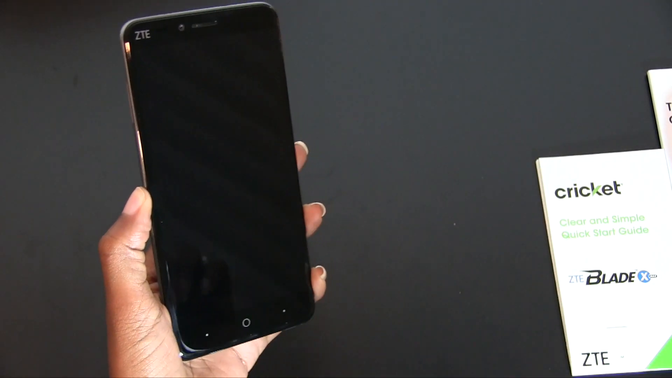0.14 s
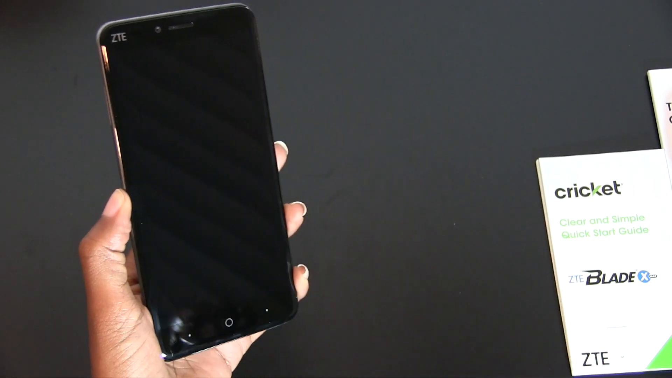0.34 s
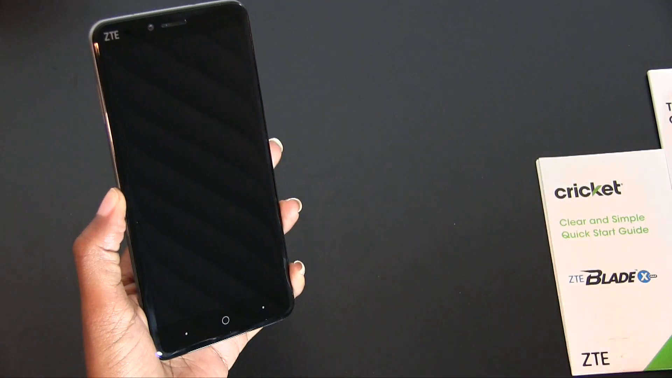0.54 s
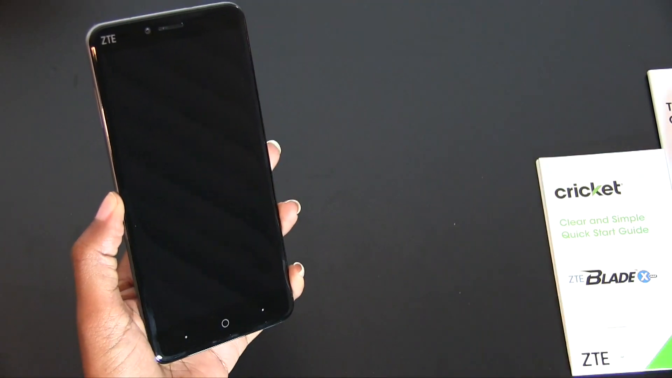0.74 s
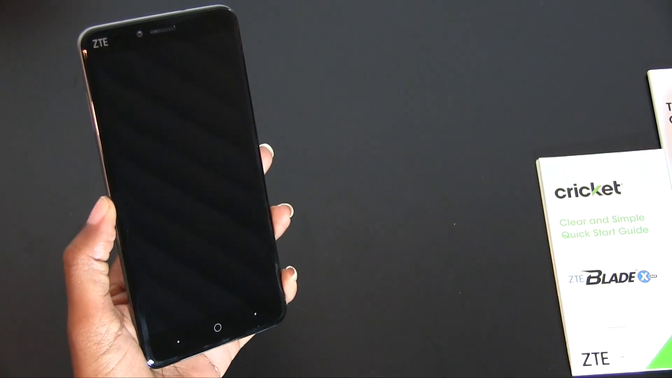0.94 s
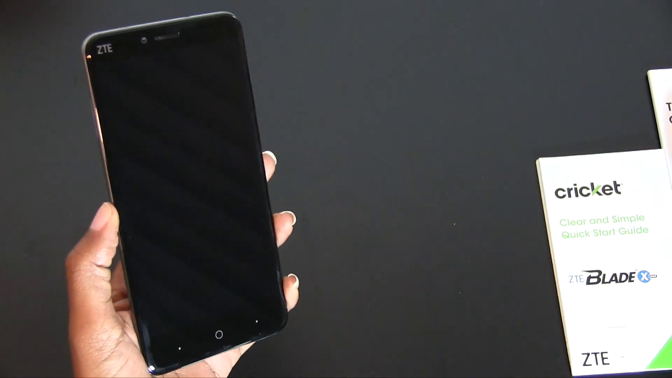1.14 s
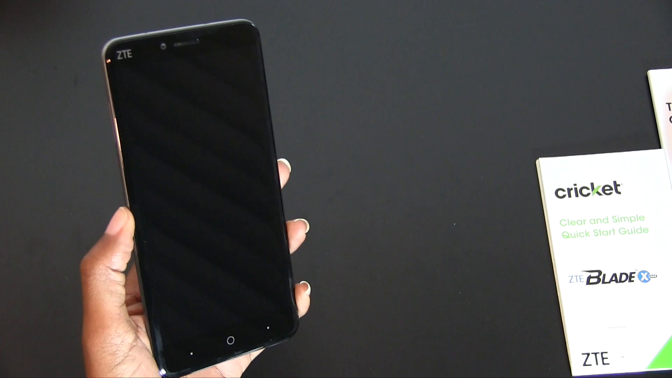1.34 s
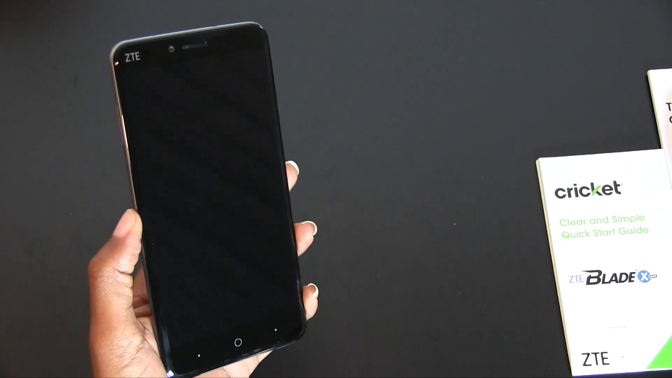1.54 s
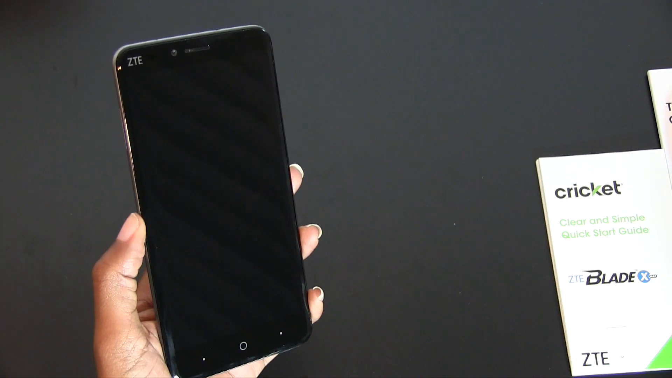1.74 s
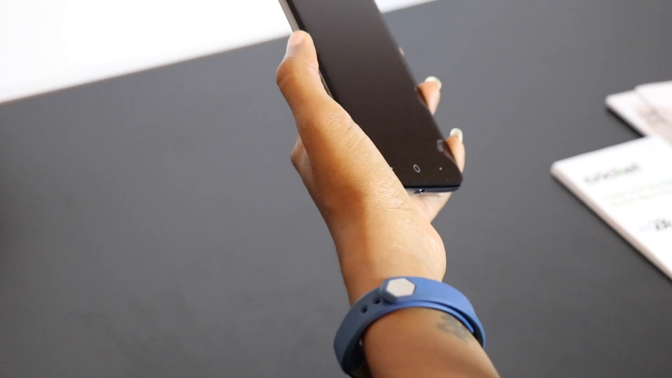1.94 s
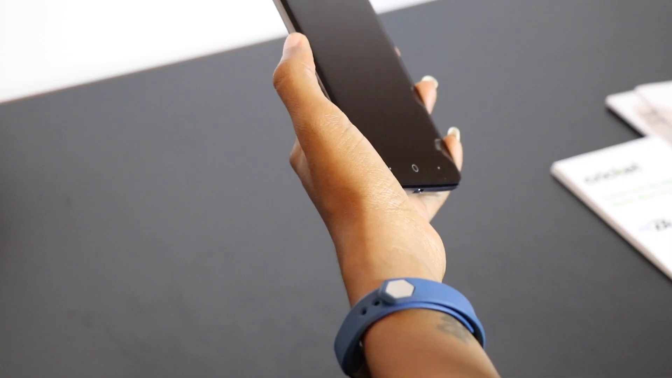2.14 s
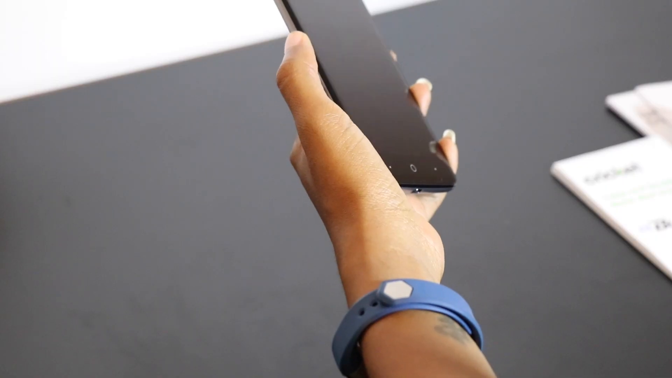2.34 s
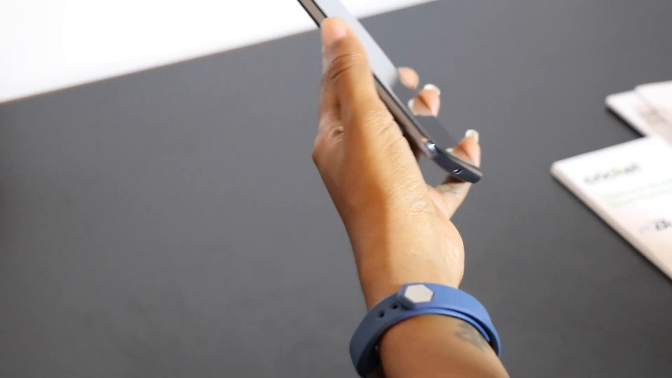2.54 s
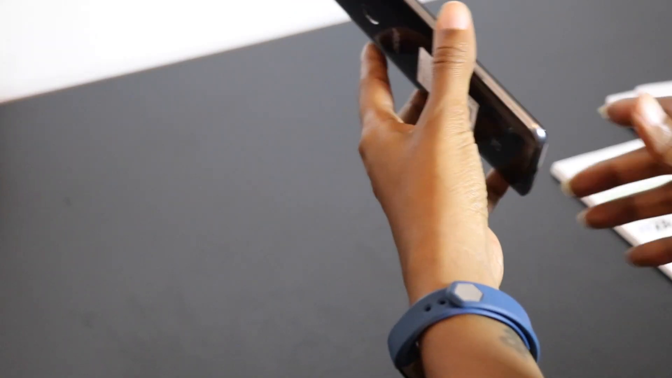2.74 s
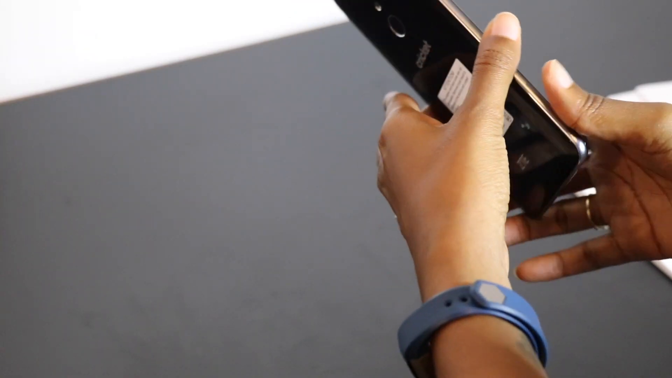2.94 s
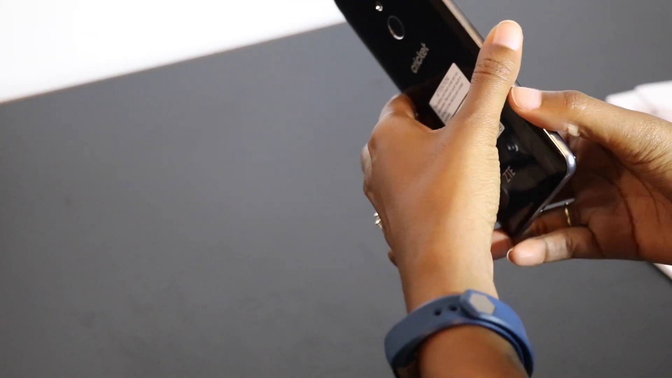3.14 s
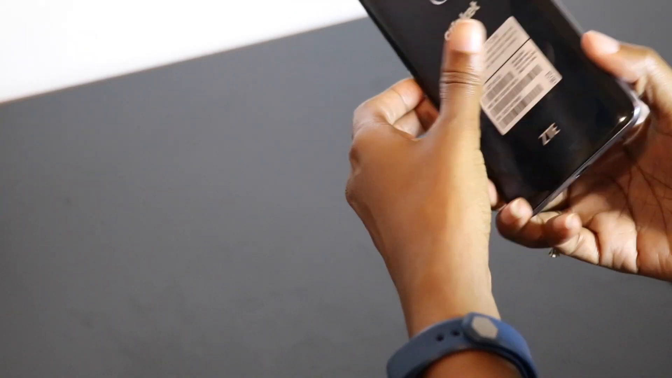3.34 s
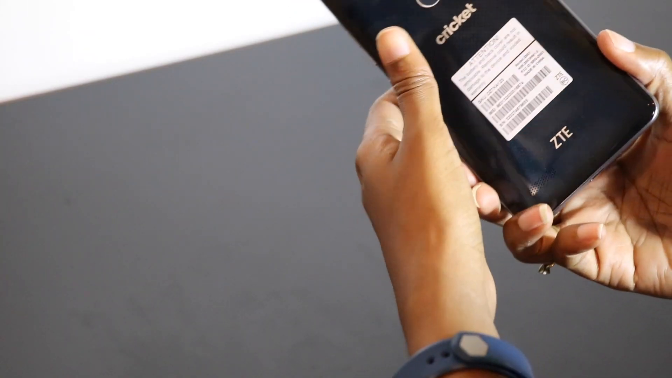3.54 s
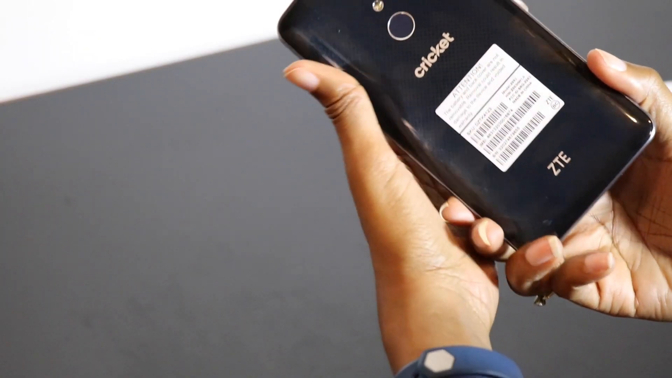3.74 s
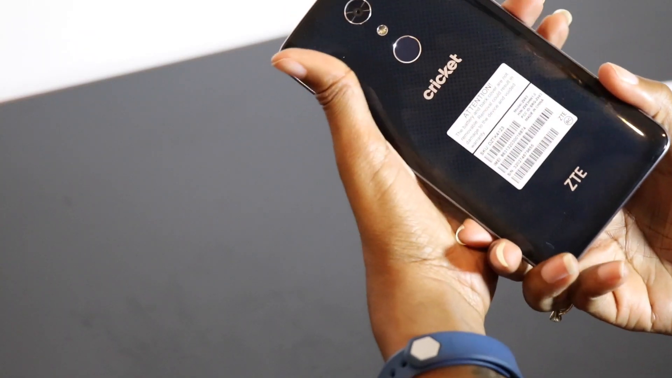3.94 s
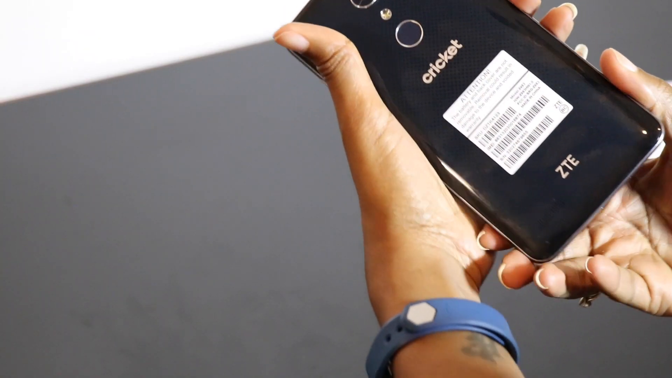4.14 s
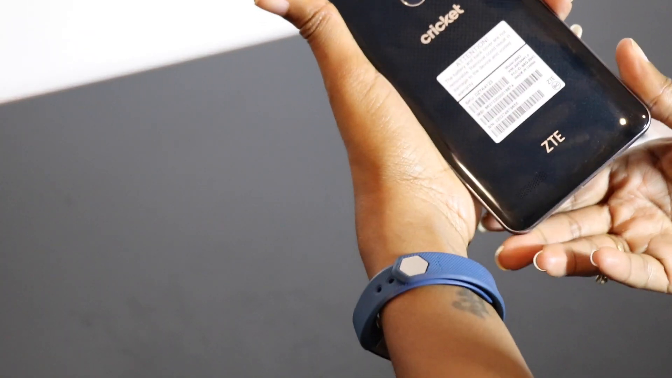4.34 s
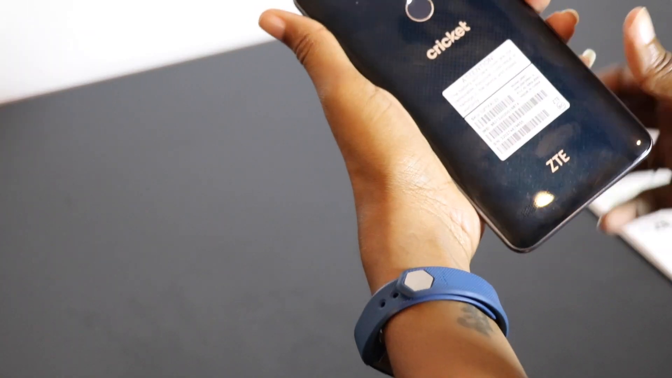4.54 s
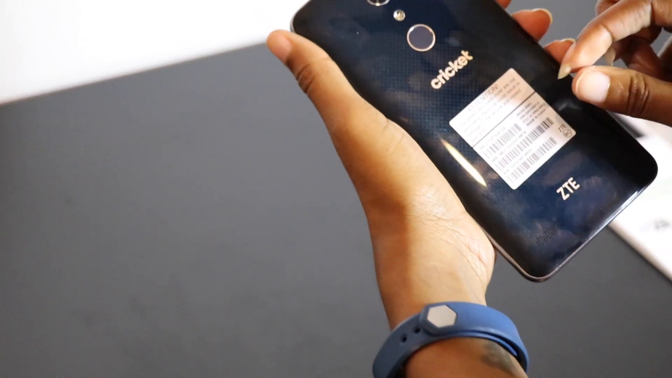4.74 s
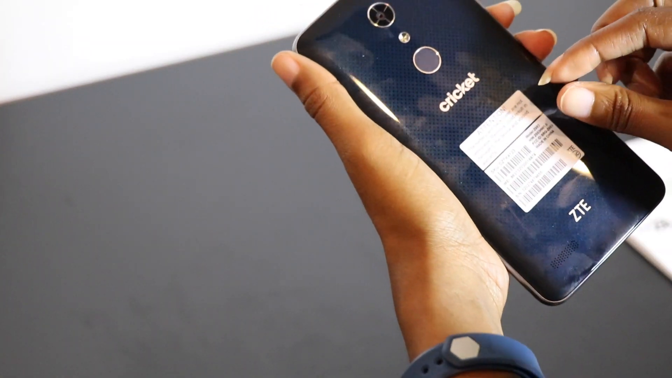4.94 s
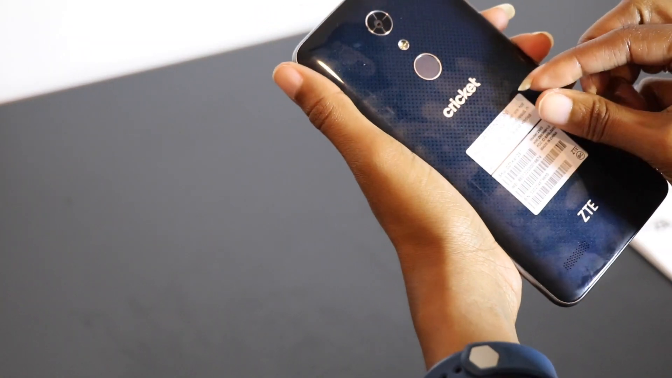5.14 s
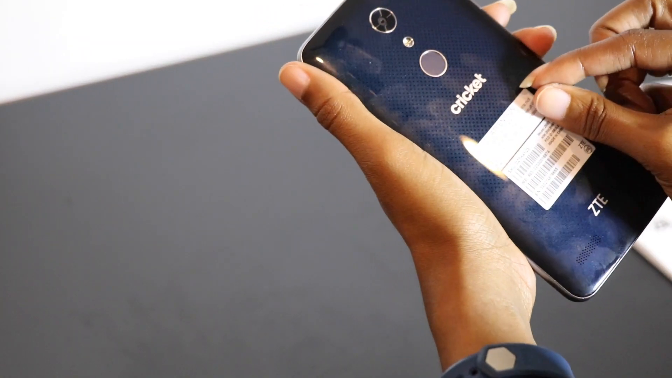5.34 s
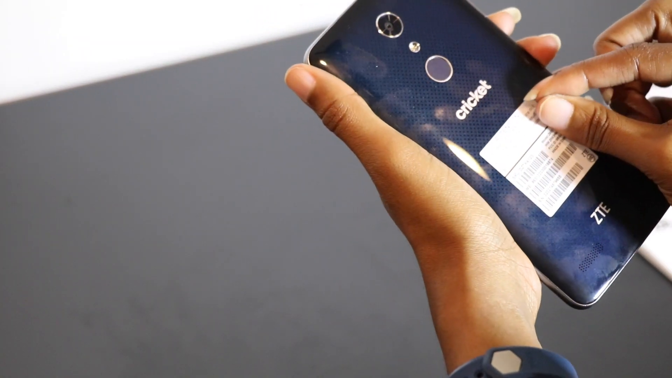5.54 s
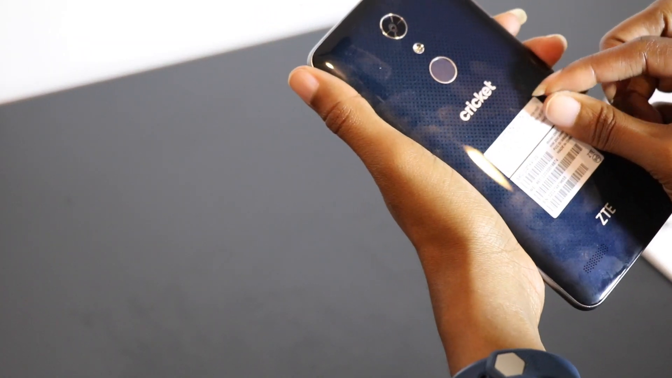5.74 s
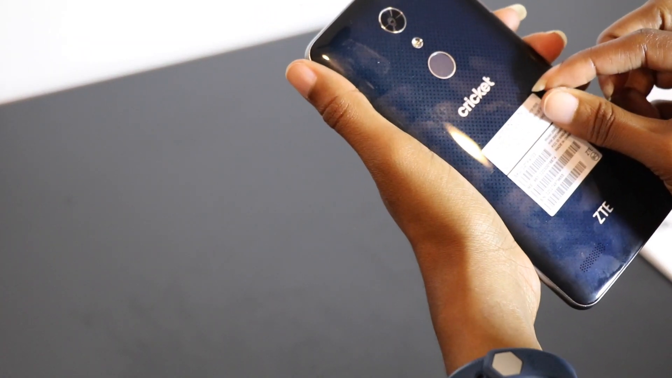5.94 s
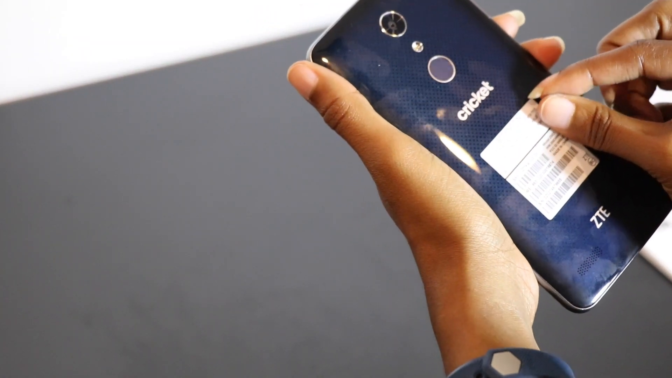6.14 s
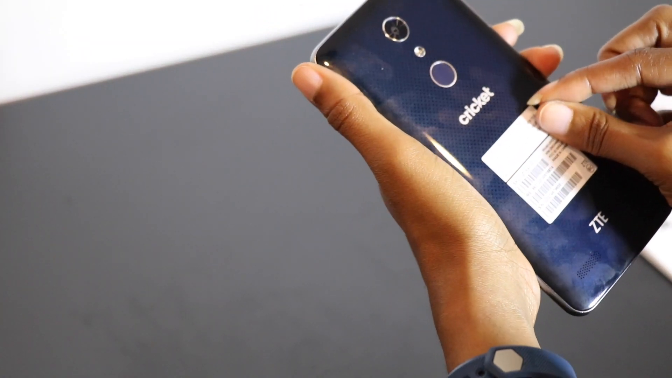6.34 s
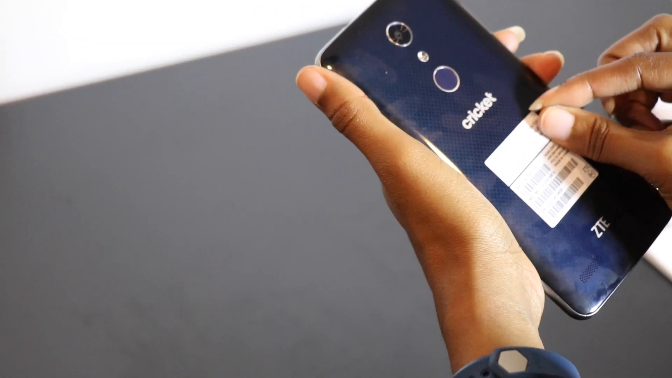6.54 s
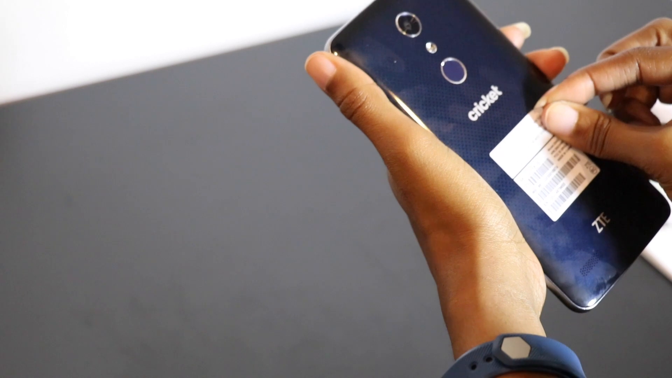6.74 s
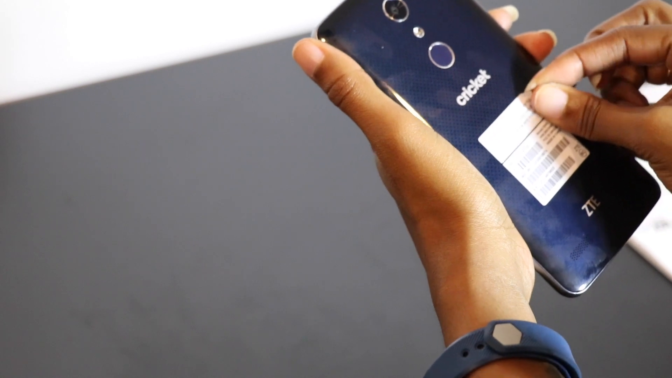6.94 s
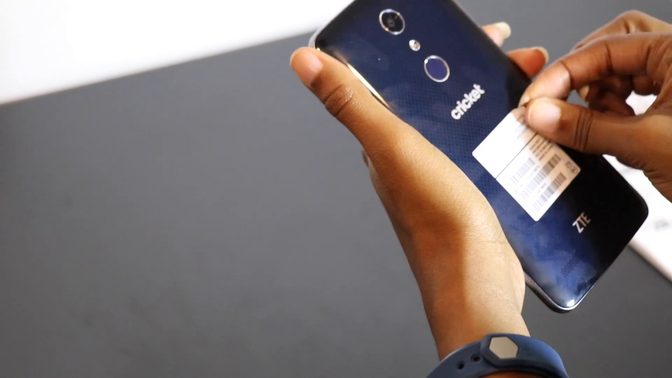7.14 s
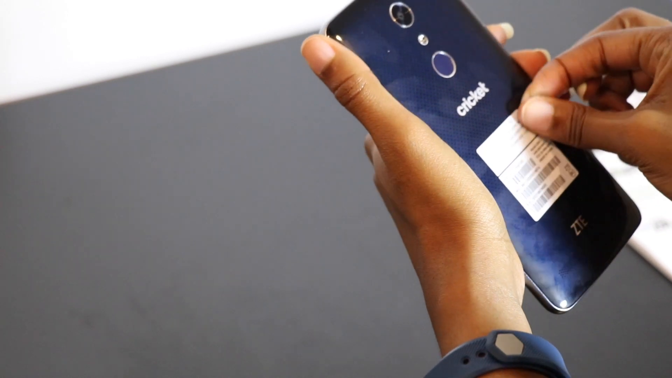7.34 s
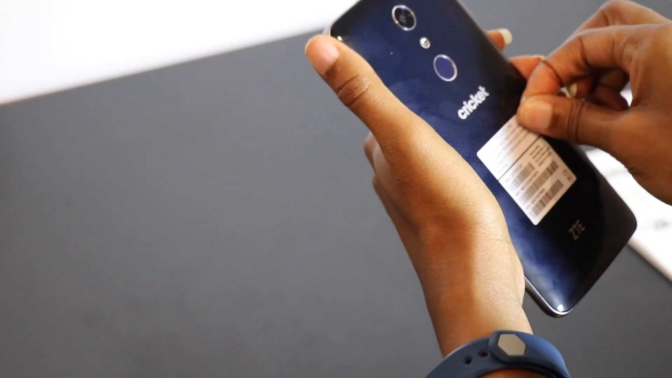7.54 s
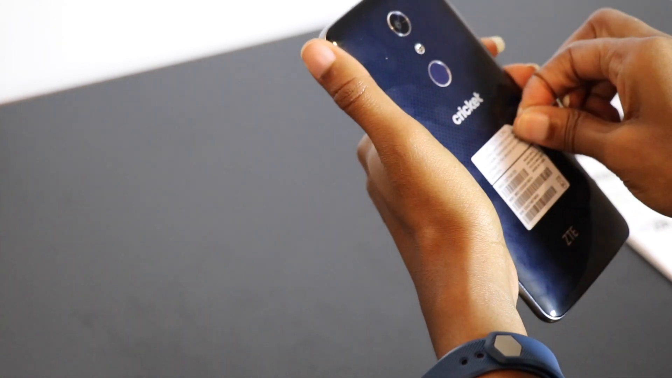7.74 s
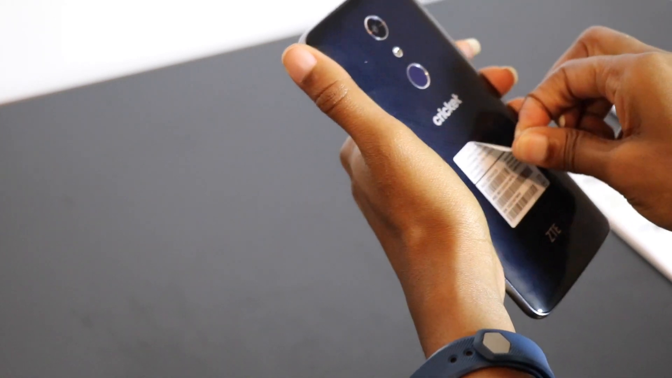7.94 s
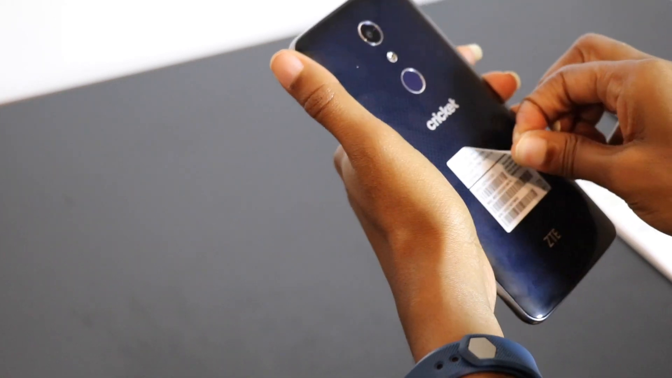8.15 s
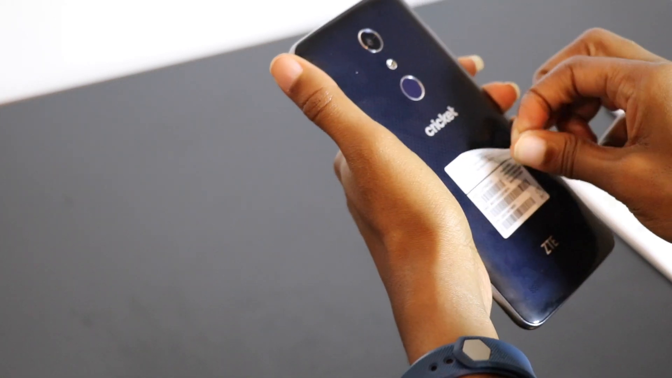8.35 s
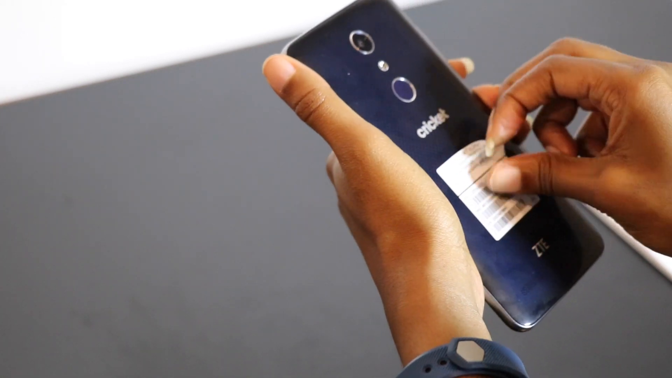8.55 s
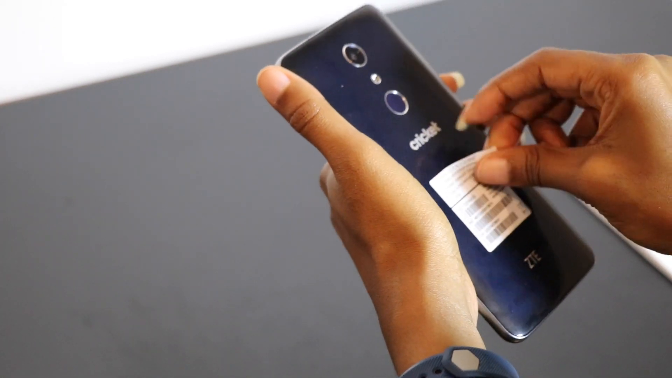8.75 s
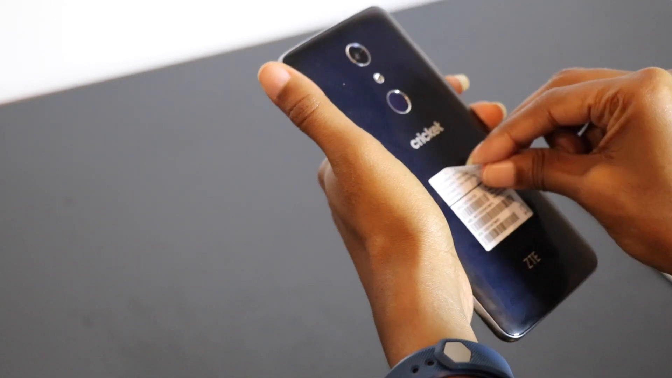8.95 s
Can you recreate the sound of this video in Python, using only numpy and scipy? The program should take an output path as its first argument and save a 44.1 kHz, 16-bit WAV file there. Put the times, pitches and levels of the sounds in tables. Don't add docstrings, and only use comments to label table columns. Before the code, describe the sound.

A quick bright film peel, sparse rustles and skin ticks, then nail picking and a loud stuttering sticker rip in a quiet, softly humming room.

```python
import sys
import numpy as np
from scipy import signal
from scipy.fft import rfft, irfft
from scipy.io import wavfile
from scipy.ndimage import uniform_filter1d

SR = 44100
rng = np.random.default_rng(int(sys.argv[2]) if len(sys.argv) > 2 else 0)


def transcribe(signal):
    frames = np.atleast_2d(signal).T
    limited = np.clip(frames, -1, 1)
    pcm = np.round(limited * 32767).astype(np.int16)
    wavfile.write(sys.argv[1], SR, pcm)


def makeup_ratio(level_db):
    decades = np.asarray(level_db, float) / 20
    return 10 ** decades


N = 400428

# resonance in Hz, width in Hz, level in dB.
SHEET_MODES = [(500, 1300, -9), (1400, 895, -3.5), (2200, 1800, -5), (3685.6, 915, -7.5)]
# resonance in Hz, width in Hz, level in dB.
FLAP_MODES = [(200.8, 320, -19), (430, 96, -14), (1047, 320, -16.5), (1375.5, 240, -8), (1900, 240, 3),
              (1889, 810, -8), (3800, 1400, -10)]
# start in seconds, peak in dB, treble centre in Hz, low ring relative in dB, length in ms.
LABEL_SNAPS = [(6.9916, -16, 7641, -2, 2.0513), (7.9167, -11, 9364, -6, 2.6637),
               (7.7323, -60.5, 7419, 12, 2.83), (7.7915, -54, 7290, -1, 2.26),
               (7.7548, -50, 7160, 3, 2.833), (7.7713, -54, 6950, 4.5, 2.492),
               (8.7392, -60, 7700, 4, 0.984), (8.7418, -58.5, 6600, 14, 5.4), (8.8676, -60, 5470, 10, 1.84),
               (8.8839, -48.5, 8870, 3, 4.9), (8.8863, -30, 10980, -15.5, 2.717),
               (8.9322, -44, 10780, 8.5, 6.472), (8.9338, -41, 9000, -14.5, 9.46),
               (8.9374, -42.5, 9495, -3.5, 5.405), (8.9727, -51, 10990, -14.5, 6)]


def unit(x):
    return x / np.sqrt(np.mean(x ** 2))


def band(x, hz, width):
    return signal.lfilter(*signal.iirpeak(min(hz, 0.4 * SR), hz / width, SR), x)


def below(x, hz):
    return signal.sosfilt(signal.ellip(8, 0.2, 70, hz, fs=SR, output="sos"), x)


def walk(rate, size=N):
    hold = int(SR / rate)
    steps = np.repeat(rng.standard_normal(size // hold + 1), hold)
    return uniform_filter1d(uniform_filter1d(steps, hold), hold)[:size]


def all_directions(sound):
    power = abs(rfft(sound)) ** 2
    high = np.clip(np.arange(len(power)) * SR / len(sound) / 1500 - 1.6, 0, 1)
    power = (1 - high) * uniform_filter1d(power, size=21) + high * uniform_filter1d(power, size=91)
    folded = irfft(np.log(abs(power) + 1e-12)) * (np.arange(len(sound)) < len(sound) // 2)
    folded[0] /= 2
    return irfft(np.exp(rfft(folded)))


def snaps(table, body, wide, air_db, kick, rise_ms, spread, room_db, room_shift=1, room_ring_db=0):
    out = np.zeros((2, N + 2000))
    t = np.arange(2000) / SR
    pull = -1.0 * (np.arange(len(t)) == int(rise_ms * SR / 1000))
    for (s, db, hz, low_db, ms), slips in zip(table, rng.standard_normal((len(table), len(t)))):
        start = int(s * SR)
        rise = np.minimum(t * 1000 / rise_ms / np.sqrt(ms), 1)
        flurry = slips * np.exp(-t * 2200 / ms) * rise
        jerk = kick / ms * pull
        smooth = jerk + flurry * min(ms / 6, 1) ** 3
        ring = sum(makeup_ratio(g) * band(smooth + 0.35 * flurry, f, w) / np.sqrt(w) for f, w, g in body)
        ring = ring / abs(ring).max()

        def radiate(force, centre, width, ring_db):
            treble = band(band(force, centre, width), centre, min(2 * width, 3.7 * centre))
            treble = treble + makeup_ratio(air_db) * band(force, 0.8 * centre, 1.1 * centre)
            return treble / abs(treble).max() + makeup_ratio(ring_db) * ring

        direct = radiate(jerk + flurry, hz, wide * hz, low_db)
        around = radiate(smooth, hz * room_shift, spread * hz, low_db + room_ring_db)
        around = all_directions(around)
        around *= makeup_ratio(room_db) * np.sqrt(np.sum(direct ** 2) / np.sum(around ** 2))
        out[:, start:start + len(t)] += makeup_ratio(db) * np.array([direct, around])
    return out[:, :N]


def scrape(tables, wide, grain_db, flicker_db, rate):
    out = np.zeros(N)
    centres = 2 ** np.arange(8.75, 13.8, 0.25)
    for table in tables:
        s, db, hz = np.transpose(table)
        i = np.arange(int(s[0] * SR), min(int(s[-1] * SR), N))
        sizes_db = grain_db * np.minimum(rng.exponential(size=len(i)), 4)
        sizes_db = sizes_db + flicker_db * walk(rate, size=len(i))
        grains = rng.standard_normal(len(i)) * makeup_ratio(sizes_db)
        bank = np.array([band(band(grains, c, 0.3 * c), c, 0.3 * c) / np.sqrt(c) for c in centres])
        octaves_off = np.log(centres[:, None] / np.interp(i / SR, s, hz))
        share = np.exp(-octaves_off ** 2 / wide ** 2)
        fade_in = i - i[0] + 300 * (i[0] < 9)
        edge = np.minimum(np.minimum(fade_in, i[-1] - i) / 300, 1)
        out[i] += unit((share * bank).sum(axis=0)) * makeup_ratio(np.interp(i / SR, s, db)) * edge
    return out


def strokes(rows):
    drop_db = 21.5
    return [[(s - swell, db - drop_db, hz), (s, db, hz), (s + fade, db - drop_db, hz)]
            for s, db, hz, swell, fade in rows]


def ventilation():
    # frequency in Hz, density in dB per Hz.
    air_spectrum = [(12, -32.5), (20, 2), (53, -2.5), (88, -10.5), (129, -10), (166, -16.5), (239, -10.5),
                    (290, -23), (394, -24), (885, -22.5), (1080, -29.5), (2040, -31), (2850, -38.5),
                    (11800, -44), (15600, -45.5)]
    # centre in Hz, width in Hz, level in dB.
    hum_bands = [(38.546, 6.4, -61), (118.47, 6.2, -72.5), (208.95, 5.3, -83), (333.1, 10, -84),
                 (879.93, 31, -83.5), (1176.7, 5, -90)]
    hz = np.maximum(np.arange(N // 2 + 1) * SR / N, 1)
    at, db = np.transpose(air_spectrum)
    shape = makeup_ratio(np.interp(np.log(hz), np.log(at), db))
    air = unit(irfft(rfft(rng.standard_normal(N)) * shape, N))
    hum = sum(makeup_ratio(db) * unit(band(band(rng.standard_normal(N), f, w), f, w)) for f, w, db in hum_bands)
    mains = makeup_ratio(-66 + 1.2 * walk(4.9)) * np.sin(2 * np.pi * 241.32 * np.arange(N) / SR)
    return below(makeup_ratio(-60 + 0.5 * walk(0.9487)) * air + hum + mains, 15800)


def film_peel():
    # time in seconds, level in dB.
    pull_levels = [
        (0.0, -50.5),
        (0.057, -84),
        (0.106, -63.5),
        (0.13, -56.5),
        (0.168, -54),
        (0.21, -54.5),
        (0.274, -49),
        (0.31, -89),
    ]
    hiss = [(s, db, 10100) for s, db in pull_levels]
    bend = [(0, -59, 2191.3), (0.275, -59, 2191.3)]  # s, dB, Hz
    out = scrape([hiss], 0.2097, grain_db=5.0, flicker_db=1.0, rate=184.63)
    return out + scrape([bend], 0.9728, grain_db=2.5, flicker_db=3.42, rate=70.82)


def film_crackles():
    # start in seconds, peak in dB, low ring relative in dB.
    jumps = [(0.0037, -28, -4.5), (0.0096, -34, -1), (0.0153, -26.5, -9), (0.0194, -33, -7.5),
             (0.027, -36.5, -6), (0.0325, -35, -6.5), (0.0372, -23, -6.5), (0.045, -44, 8),
             (0.0485, -28.5, 0), (0.0541, -32.5, -7), (0.0596, -24.5, -4.5), (0.0647, -48.5, 14.5),
             (0.0721, -24.5, -1.5), (0.0855, -21.5, -2), (0.094, -26.5, -5), (0.0998, -29.5, -7.5),
             (0.147, -30.5, -5.5), (0.169, -37.5, -5), (0.253, -42, -19), (0.2573, -39.5, -9),
             (0.264, -43, -12), (0.268, -24, -19), (0.2724, -28.5, -23.5), (0.274, -24, -4),
             (0.3133, -37.5, -10)]
    off = np.exp(0.05 * rng.standard_normal((len(jumps), 2)))
    rows = [(s, db, 10200 * a, low_db, 1.0 * b ** 5)
            for (s, db, low_db), (a, b) in zip(jumps, off)]
    return snaps(rows, SHEET_MODES, wide=0.83, air_db=-17, kick=10, rise_ms=0.12, spread=0.86, room_db=3.5)


def film_folds():
    # start in seconds, peak in dB, treble centre in Hz, low ring relative in dB, length in ms.
    creases = [(0.0671, -20, 6811, 0, 3.881), (0.115, -41.5, 9000, -12, 1.202),
               (0.1508, -37, 11000, -2.5, 1.187), (0.1519, -26, 7575, -3, 4.95),
               (0.1893, -43, 8000, 4.5, 1.1), (0.1554, -41, 8800, 4.5, 3.66),
               (0.2145, -43.5, 9000, -1.5, 3.83), (0.6546, -45.5, 10950, -7, 0.72),
               (0.7344, -50.5, 10300, -1, 3.753), (1.2925, -60.5, 4208, 9.5, 11.52),
               (1.2973, -64.5, 3200, -0.5, 6), (1.373, -47, 7983, -24, 2.152),
               (1.7775, -57.5, 7800, 5.5, 1.538), (2.094, -48.5, 8800, 0, 1.05),
               (2.0984, -62, 8100, 11, 6.99), (2.1893, -35.5, 8290, -10.5, 6.45),
               (2.193, -54.5, 8200, 4, 3.363)]
    return snaps(creases, SHEET_MODES, wide=0.62, air_db=-22.5, kick=13.0, rise_ms=0.1,
                 spread=0.86, room_db=3.0)


def facet_pings():
    # start in seconds, peak in dB, ring in Hz, length in ms.
    facets = [(0.2744, -39.5, 2000, 2.366), (0.334, -53.5, 700, 6.3), (0.378, -56, 1605, 3.024),
              (1.1697, -50.5, 1398, 10.89), (1.178, -49.5, 1750, 7.72), (1.19, -67.5, 6431, 7.96),
              (1.1954, -49.5, 1801, 6.86), (1.293, -57, 6452, 4.98), (1.298, -58.5, 6482, 6.93),
              (1.305, -62, 1706, 6.1), (1.331, -73, 6453, 14.18), (1.37, -62, 5793, 2.558),
              (6.028, -66.5, 1500, 3), (6.111, -65.5, 1800, 2.9), (6.262, -69.5, 2793, 3),
              (0.67, -56, 1950, 11.3), (8.743, -53.5, 1950, 3.3), (0.636, -60, 451.4, 14.05),
              (8.885, -46.5, 1750, 7.32), (8.894, -55.5, 7000, 23.8), (8.896, -46.5, 11300, 12),
              (8.936, -55, 6982, 15.2), (8.938, -52.5, 9288, 22.44)]
    out = np.zeros((2, N))
    for s, db, hz, ms in facets:
        out += snaps([(s, db, hz, -40, ms)], SHEET_MODES[:1], wide=210 / hz, air_db=-34, kick=3.0,
                     rise_ms=0.3, spread=0.15, room_db=0)
    return out


def bumps_and_ticks():
    # start in seconds, peak in dB, centre in Hz, low ring relative in dB, length in ms.
    dull_bumps = [(0.2752, -40.5, 440.9, -12.5, 1.803), (0.574, -58.5, 1499, -23, 2.46),
                  (0.635, -54.5, 463.3, -31.5, 49.1), (1.191, -68, 4600, -4, 8.7),
                  (1.297, -61, 8000, -20.5, 8.92), (1.376, -57, 5000, -19.5, 26.85),
                  (2.372, -63, 4790, -11.5, 5.95), (2.553, -59.5, 9140, 3.5, 3.617),
                  (2.7769, -61, 7006, -3.5, 6.1), (5.8595, -59, 7600, 7, 2.175),
                  (5.862, -58.5, 1100, -8.5, 2.2), (5.8673, -55.5, 10000, 2.5, 52.97),
                  (5.868, -47, 1158, -12.5, 2.071), (5.8693, -45.5, 8100, -14.5, 3.402),
                  (6.715, -63, 3200, -18, 4.2), (1.6158, -54.5, 6081, -25, 3.504),
                  (2.136, -49.5, 3600, -11.5, 9), (1.173, -57, 3800, -7, 3.33),
                  (1.14, -63.5, 3478, -5.5, 3.94)]
    # start in seconds, peak in dB, treble centre in Hz, length in ms.
    skin_ticks = [(2.9973, -56, 10480, 1.105), (3.0183, -45, 10350, 1.44), (3.209, -59.5, 10460, 2.02),
                  (3.217, -63, 9800, 5.1), (3.2541, -48, 10400, 1.0), (3.2602, -50.5, 11620, 5),
                  (3.268, -50, 11600, 6.1), (3.2714, -38.5, 11040, 1.183), (3.3051, -51, 11300, 6.24),
                  (3.3107, -54.5, 11390, 6.01), (3.312, -47, 11790, 12.96), (3.5396, -57, 10510, 6.83),
                  (4.4116, -56, 8813, 1.006), (4.669, -58.5, 9044, 2.9), (4.9183, -55.5, 9600, 9.5),
                  (4.9397, -55, 10160, 6.07), (4.9415, -47.5, 9800, 13), (4.956, -40, 10100, 3.12),
                  (6.112, -59, 9050, 1.5), (6.262, -60, 9000, 1.5)]
    ticks = [(s, db, hz, -18, ms) for s, db, hz, ms in skin_ticks]
    return snaps(ticks + dull_bumps, SHEET_MODES, wide=0.46, air_db=-15, kick=7.9, rise_ms=0.084,
                 spread=0.24, room_db=-4.0)


def sheet_whip():
    # time in seconds, level in dB, centre in Hz.
    glide = [
        (0.277, -56.5, 1200),
        (0.285, -42, 1557),
        (0.292, -42.5, 2544),
        (0.301, -53.5, 3700),
    ]
    return scrape([glide], 0.238, grain_db=-1.5, flicker_db=7.0, rate=194.7)


def sheet_rustles():
    # loudest moment in seconds, level in dB, centre in Hz, swell in seconds, fade in seconds.
    rubs = [(0.285, -46, 1197, 0.01993, 0.06765), (0.33, -50.5, 946.5, 0.06753, 0.08325),
            (0.52, -71, 1300, 0.03636, 0.0394), (0.576, -66.5, 1100, 0.02102, 0.02273),
            (0.676, -65.5, 1900, 0.05335, 0.0233), (0.72, -64, 940.5, 0.05229, 0.0268),
            (1.092, -65, 900, 0.03764, 0.02524), (1.175, -64.5, 3300, .02, 0.02258),
            (1.2, -61, 2200, 0.03365, 0.06195), (1.302, -61, 1580, 0.010884, 0.11213),
            (1.165, -58.5, 1300, 0.04313, 0.02213), (2.115, -60.5, 1500, 0.03, 0.11),
            (0.39, -63, 1100, 0.03, 0.0709)]
    return scrape(strokes(rubs), 0.426, grain_db=1.5, flicker_db=4.0, rate=120.7)


def finger_slides():
    # loudest moment in seconds, level in dB, centre in Hz, swell in seconds, fade in seconds.
    creeps = [(2.13, -72, 8414, 0.107, 0.327), (2.19, -62, 8280, 0.01883, 0.003775),
              (2.398, -72, 8555, 0.04243, 0.0415), (2.552, -70.5, 10320, 0.0463, 0.0249),
              (2.776, -71, 8330, 0.0684, 0.01917), (3.267, -66, 11360, 0.02717, 0.0306),
              (3.315, -59.5, 11650, .022, 0.0194), (3.43, -78.5, 9294, 0.0756, 0.158),
              (3.56, -74.5, 9400, 0.0478, 0.1246), (4.092, -72.5, 9320, 0.1504, 0.1796),
              (4.206, -69.5, 8800, 0.1574, 0.0469), (4.468, -66, 9401, 0.1406, 0.1855),
              (4.554, -66.5, 9432, 0.11, 0.01072), (4.75, -65.5, 9718, 0.0577, 0.0277),
              (4.95, -50, 9932, 0.02002, 0.0234), (0.732, -76, 10100, 0.02788, 0.0356),
              (5.875, -67.5, 9780, 0.0029, 0.051), (6.072, -69.5, 8157, 0.0572, 0.034),
              (2.5, -76, 10460, .03, .04), (7.635, -75, 9966, 0.01882, 0.1976),
              (7.85, -82.5, 10100, 0.1911, 0.224), (8.13, -74.5, 10060, 0.1052, 0.2144),
              (8.215, -65, 10100, 0.0445, 0.003727), (8.945, -59, 9500, 0.0032, 0.053)]
    return scrape(strokes(creeps), 0.18, grain_db=-0.5, flicker_db=1.5, rate=91)


def sheet_spring():
    # start in seconds, peak in dB, treble centre in Hz, low ring relative in dB, length in ms.
    pops = [
        (2.1966, -35, 4300, -2.5, 2.5),
        (2.1984, -17.5, 5570, -9.5, 3.2),
        (2.2004, -29, 5200, -3.5, 9),
        (2.2027, -21, 4900, -3, 2.2),
        (2.2085, -39.5, 2600, 0.5, 6),
    ]
    # resonance in Hz, width in Hz, level in dB.
    crease_modes = [(700, 270, -9.5), (1300, 600, -7.5), (2200, 1200, 4.5), (3970, 1020, 11.5)]
    return snaps(pops, crease_modes, wide=0.66, air_db=-22.5, kick=9.8, rise_ms=0.35, spread=1.2,
                 room_db=0.0, room_shift=0.85, room_ring_db=2.0)


def label_corner():
    # resonance in Hz, width in Hz, level in dB.
    corner_modes = [(199.7, 96, -10.5), (566, 290, -13.5), (1300, 711, 4), (2807, 930, -1),
                    (3860, 1857, -3)]
    # start in seconds, peak in dB, treble centre in Hz, low ring relative in dB,
    # length in ms.
    bright_echo = (7, -32, 11500, -15.5, 5)
    out = snaps(LABEL_SNAPS[:1], corner_modes, wide=0.8307, air_db=-13.5, kick=1.95, rise_ms=0.3,
                spread=0.9, room_db=6.0, room_shift=1.479, room_ring_db=-4)
    return out + snaps([bright_echo], corner_modes, wide=0.36, air_db=-17.5, kick=1.46, rise_ms=0.266,
                       spread=0.91, room_db=-1.0)


def label_picking():
    # resonance in Hz, width in Hz, level in dB.
    pick_modes = [(1750, 464.4, 3), (10482, 1500, -8.5)]
    # start in seconds, peak in dB.
    glue_threads = [(7.7862, -61), (7.7914, -56), (7.7972, -54), (7.8035, -59.5), (7.8093, -49.5),
                    (7.83, -69), (7.84, -65.5), (7.849, -61.5), (7.8649, -55.5), (7.8914, -52),
                    (7.8958, -52), (7.9016, -47.5)]
    threads = [(s, db, 10300, -18.5, 1.8) for s, db in glue_threads]
    out = snaps(LABEL_SNAPS[2:6], pick_modes, wide=0.308, air_db=-26.5, kick=3.944, rise_ms=0.29,
                spread=0.6, room_db=3.0)
    return out + snaps(threads, pick_modes, wide=0.3, air_db=-12, kick=3.0, rise_ms=0.2,
                       spread=0.6, room_db=1.5)


def label_edge():
    # resonance in Hz, width in Hz, level in dB.
    edge_modes = [(500, 370, -17.5), (1300, 650, -3), (2000, 700, -2.5), (3300, 870, -7),
                  (4790, 1800, -7.5)]
    return snaps(LABEL_SNAPS[1:2], edge_modes, wide=0.28, air_db=-13, kick=11.0, rise_ms=0.26,
                 spread=1.05, room_db=1.36, room_shift=1.1, room_ring_db=-1.5)


def label_rip():
    # start in seconds, peak in dB, treble centre in Hz, low ring relative in dB, length in ms.
    rip_snaps = [
        (8.2224, -6, 8646, -5, 2.7),
        (8.2398, -6.5, 8784, -0.5, 3),
        (8.2541, -7.5, 9780, -1.5, 2.8817),
        (8.2613, -4.5, 8397, -3, 2.6),
        (8.273, -8.5, 7836, 0.5, 4.9),
        (8.29, -3, 8609, -1, 2),
    ]
    span_hz = [1932.8, 1898.1, 2200, 1950, 2028.2, 1800]
    out = np.zeros((2, N))
    for snap, hz in zip(rip_snaps, span_hz):
        tuned = [(f * hz / 1900, w, db) for f, w, db in FLAP_MODES[4:6]]
        span = FLAP_MODES[:4] + tuned + FLAP_MODES[6:]
        out += snaps([snap], span, wide=0.6, air_db=-11, kick=11.601, rise_ms=0.36, spread=1.0,
                     room_db=6.5, room_shift=1.08, room_ring_db=-3.0)
    return out


def case_knocks():
    # resonance in Hz, width in Hz, level in dB.
    case_modes = [(150, 160, -13.5), (502, 190, -13), (1100, 640, 4.5), (1812.7, 290, 4), (3050, 400, -6),
                  (4265.6, 1900, -22.5)]
    return snaps(LABEL_SNAPS[6:], case_modes + FLAP_MODES[-2:-1], wide=0.48, air_db=-6.0, kick=2.2,
                 rise_ms=0.12, spread=1.05, room_db=9.5)


def room(x):
    # delay in ms, level in dB, smear in ms.
    reflections = [
        (1.79, -13.5, 1.4),
        (7.896, -21, 0.86),
        (12.23, -22.5, 2.2),
        (24, -32, 3.0),
    ]
    # band centre in Hz, level in dB, 60 dB decay time in seconds.
    tail_bands = [(250.5, -40, .3), (696, -15.5, 0.48), (1800, -18.5, 0.264), (3000, -21, 0.24),
                  (5000, -14, 0.408), (9000, -16.5, 0.273), (14000, -16.5, .2)]
    t = np.arange(SR // 2) / SR
    reply = np.zeros(len(t))
    for ms, db, smear in reflections:
        late = np.maximum(t * 1000 - ms, 0)
        fade = np.minimum(late / 1.6, 1) * np.exp(-late / smear)
        puff = band(rng.standard_normal(len(t)), 10000, 11000) * fade
        reply += makeup_ratio(db) * puff / np.sqrt(np.sum(puff ** 2))
    for hz, db, t60 in tail_bands:
        wash = unit(band(band(rng.standard_normal(len(t)), hz, hz), hz, hz))
        fade = makeup_ratio(-60 * t / t60) * np.minimum(t / 0.0033, 1)
        reply += makeup_ratio(db) * wash * fade * np.sqrt(hz / SR / np.sum(fade ** 2))
    return signal.fftconvolve(x, reply)[:N]


def scene():
    near = film_crackles() + film_folds() + facet_pings() + bumps_and_ticks() + sheet_spring()
    near += label_corner() + label_picking() + label_edge() + label_rip() + case_knocks()
    near += film_peel() + sheet_whip() + sheet_rustles() + finger_slides()
    capsule = signal.butter(4, 14400, fs=SR, output="sos")
    direct, around = signal.sosfilt(capsule, near)
    return (direct + room(around) + ventilation())[None]


def low_pass(x):
    return signal.sosfilt(signal.butter(12, 16820, fs=SR, output="sos"), x)


def record(dry):
    return low_pass(dry)


dry = scene()
out = record(dry)
transcribe(out)
```